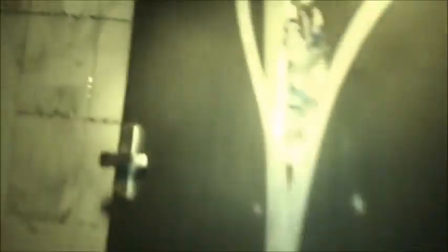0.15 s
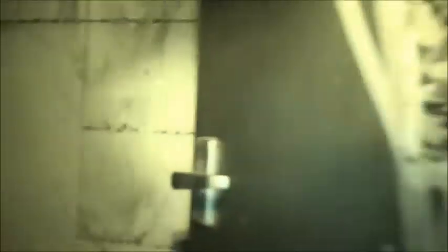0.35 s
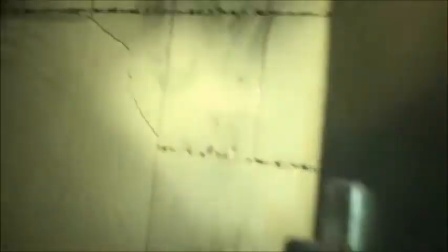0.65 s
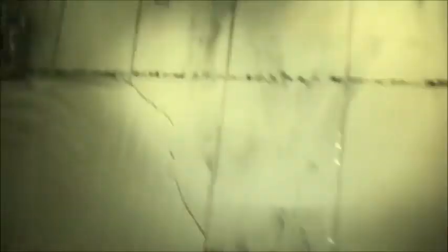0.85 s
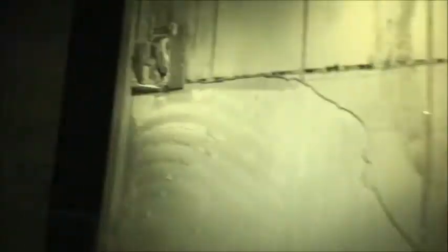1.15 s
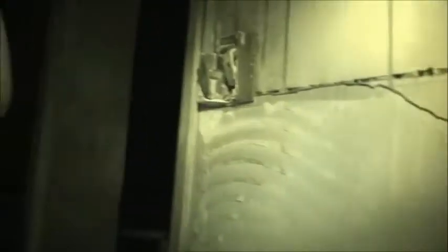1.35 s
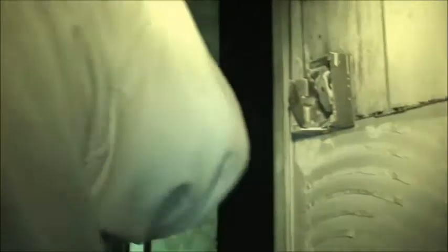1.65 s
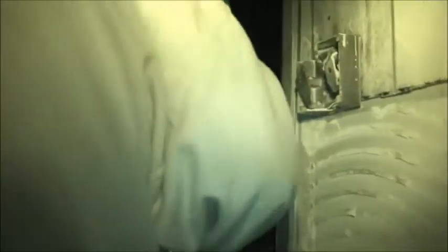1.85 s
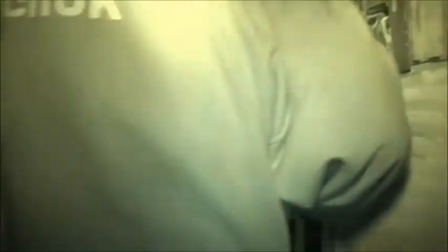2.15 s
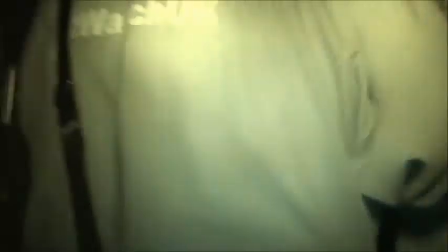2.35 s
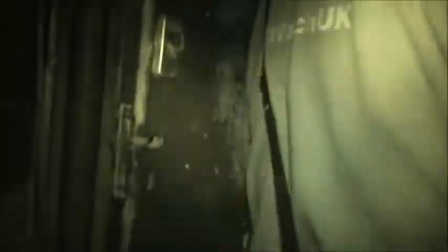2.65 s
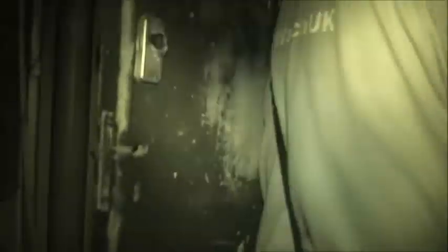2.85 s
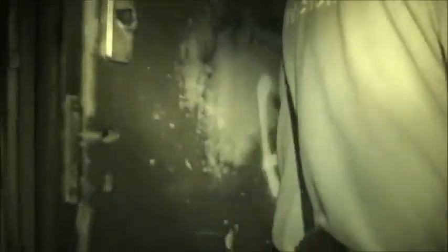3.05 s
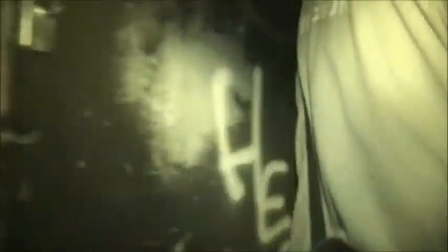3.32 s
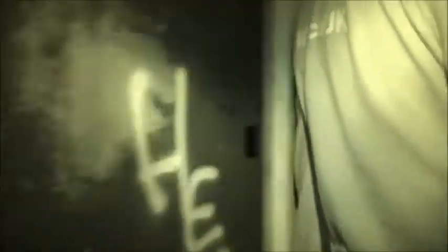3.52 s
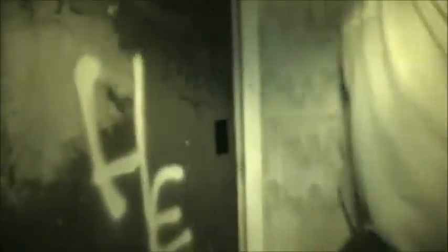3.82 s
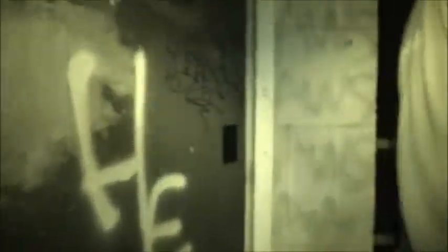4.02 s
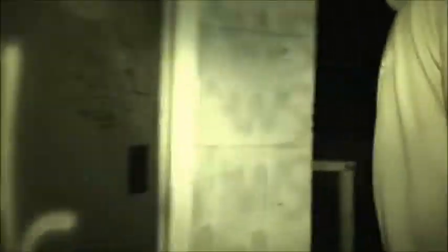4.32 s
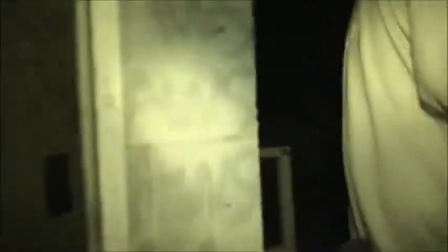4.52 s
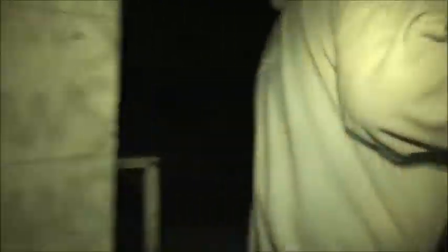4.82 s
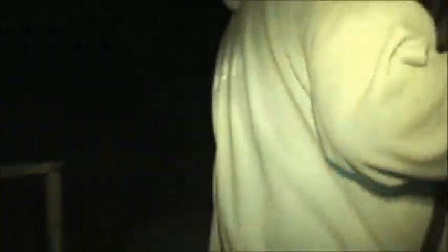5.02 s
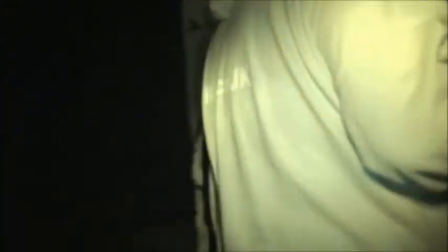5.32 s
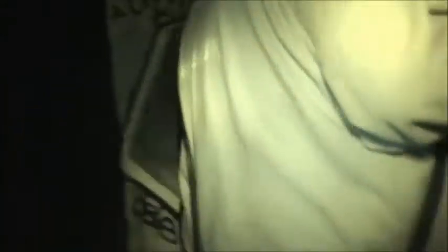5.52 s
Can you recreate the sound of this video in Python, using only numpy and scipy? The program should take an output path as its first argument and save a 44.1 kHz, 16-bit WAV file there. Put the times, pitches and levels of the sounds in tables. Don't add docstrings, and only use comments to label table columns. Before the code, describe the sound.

A sharp crunch of plaster grit opens, then a piece of debris drags across the floor with a rising scrape and low boom. Uneven steps follow, snapping splinters, rattling and squeaking glass shards, and blocks knocking. The densest crunch comes just after four seconds. Bare, hard-walled room with short reverberation; close, nearly mono camera microphone with faint hiss and handling rubs.

```python
import sys
import numpy as np
from scipy import signal
from scipy.fft import rfft, irfft, next_fast_len
from scipy.io import wavfile

SR = 44100
rng = np.random.default_rng(int(sys.argv[2]) if len(sys.argv) > 2 else 0)


def waveform_to_disk(signal):
    frames = np.transpose(np.atleast_2d(signal))
    scaled = np.clip(frames, -1, 1) * 32767
    samples = np.round(scaled).astype(np.int16)
    wavfile.write(sys.argv[1], SR, samples)


def how_loud(loudness_db):
    steps = np.asarray(loudness_db, float) / 20
    return 10 ** steps


N = 250047

# f/Hz, density/(dB per Hz)
AIR_COLOUR = [(90, -17), (150, -6.5), (1180, -18.5), (1360, -4), (1490, -34), (2710, -17), (3500, -28),
              (15000, -33.5)]
AIR_DB = -57
# t/s, level/dB, hold/s, fade/(dB/s), rise/(dB/s)
HANDLING = [
    (0.0, -56, .01, 100, 50),
    (0.73, -46.5, 0.33, 64, 63),
    (1.886, -65, .01, 300, 47),
    (4.15, -67, .03, 30, 10),
    (5.2, -62, .01, 110, 57),
    (2.55, -65, 0.03, 68, 65),
    (5.55, -80, .2, 67, 52),
]
# f/Hz, side minus mid/dB
SIDE_LEVEL = [(60, -32), (200, -19.5), (700, -13), (4400, -15.5), (9000, -12.5), (10300, -2.5),
              (11500, -11.5), (15000, -36)]
# f/Hz, T60/s
ROOM_T60 = [(100, 0.83), (1000, 0.75), (5000, 0.34), (14000, 0.069)]
ROOM_DB, NEAR_DB, NEAR_T60_S = -23, -7.5, 0.072
# t/s, level/dB, hold/s, fade/(dB/s), rise/(dB/s)
SWISH = (3.5, -52.5, -0.03, 24, 403)
FLOOR_MODES_HZ = [145, 184, 222, 282, 366]
# t/s, peak/dB, f/Hz, T60/s
THUDS = [(0.352, -31.5, 172, 0.26), (0.54, -28, 150, 0.57), (0.7, -26.5, 214, 0.34), (0.78, -23, 184, 0.79),
         (0.95, -29, 214, 0.6), (1.376, -30.5, 250, 0.48), (1.818, -31, 206, 0.45),
         (2.144, -31.5, 222, 1.4), (2.536, -28.5, 169, 0.55), (2.973, -34.5, 141, 0.34),
         (3.291, -37.5, 129.9, 0.12), (4.03, -31.5, 265, 0.29), (4.185, -23, 135, 0.12),
         (4.952, -38.5, 167, 0.73),
         (5.055, -32.5, 206, .2),
    (5.161, -35, 140, .3),
]
# f/Hz, level/dB, T60/s
PANE = [(1220, -16, .8), (2109, -7, 1.4), (3380, -17, .6), (3630, -6, 0.32), (4550, -11, 0.58)]
PANE_S, PANE_DB = 5.34, -45
# f/Hz, density/(dB per Hz)
GRIT_COLOUR = [(53, -35), (90, -7), (151, -6.5), (244, -3.5), (429, -4.5), (1440, -1.5), (2230, -4),
               (2950, -6), (4750, -4), (12100, -8.5), (13500, -14), (16000, -53)]
GRIT_SPLITS_HZ = [350, 2800, 8000]
GRIT_GROUPS_DB = [-10.5, 0.95, -1, -16.5]
# t/s, level/dB, hold/s, fade/(dB/s), brightness/(dB per band group)
SHUFFLES = [(0.0, -35, 0.01, 77, 4), (0.304, -60, 0.04, 60, -7), (0.33, -45, 0.021, 47, 5.5),
            (0.527, -43, 0.27, 73, 9), (1.352, -46.5, 0.045, 129, 6.5), (1.92, -63, 0.039, 52, -11),
            (1.984, -37, 0.019, 48, -2), (2.24, -50.5, 0.16, 27, 0.5), (2.64, -43, 0.017, 71, 7.5),
            (3.233, -43.5, 0.065, 70, -5), (3.42, -40, 0.023, 99, 0.5), (3.597, -68, 0.15, 35, 15),
            (4.22, -34.5, 0.015, 72, -3), (4.336, -36.5, 0.022, 126, 5.5), (5.136, -38, 0.058, 69, 1.5),
            (5.47, -55, 0.23, 30, -8)]
SHUFFLE_RISE_DB_PER_S, GRIT_REST_DB = 138, -64
DRAG_GRIT_DB = -2.5
# t/s, level/dB, contact resonance f/Hz
DRAG = [
    (.43, -99, 1300),
    (.47, -31.5, 1370),
    (.5, -28.5, 1380),
    (.6, -22, 1680),
    (.72, -21, 2060),
    (.9, -22, 2220),
    (1.0, -26, 2120),
    (1.07, -44.5, 2130),
    (1.14, -63, 2000),
]
# f/Hz, width/Hz, level/dB
DRAG_BODY = [(1345, 69, 14), (1900, 27, -3), (2050, 76, -3), (2620, 47, -15)]
# t/s, f/Hz
DRAG_SQUEAL = [(.43, 12800), (.6, 12600), (.75, 11850), (1.12, 11500)]
# f/Hz, width/Hz, level/dB
DRAG_BOOM = [(184, 13, 0), (214, 18, -1), (150, 11, -4.5)]
# t/s, level/dB, hold/s, fade/(dB/s), rise/(dB/s)
SQUEAL = (.59, -37, .08, 110, 300)
# t/s, level/dB, hold/s, fade/(dB/s), rise/(dB/s)
BOOM = (0.65, -37.5, 0.9, 120, 64)
# t/s, level/dB, hold/s, fade/(dB/s), rise/(dB/s)
RATTLES = [
    (1.347, -31.5, 0.035, 330, 453),
    (2.775, -33.5, 0.023, 360, 86),
    (4.435, -35, 0.0051, 380, 500),
    (5.34, -32.5, 0.014, 320, 2500),
    (5.282, -31, 0.006, 590, 3000),
]
# f/Hz, width/Hz, level/dB
HEAPS = [
    [(4100, 9.2, -12.5), (4420, 210, -0.5), (6000, 160, -2), (6700, 48, -4), (7180, 60, -5),
     (9420, 70, -4.5), (8900, 81, -10), (15000, 160, -6)],
    [(4620, 85, 1.5), (4880, 9.9, -6.5), (5260, 100, -4), (5500, 62, -15), (5800, 96, -19), (7160, 38, -10),
     (7100, 63, -4.5), (7570, 31, -8), (8040, 26, -9), (11500, 39, -16),],
    [(860, 46, 4.5), (1570, 180, -3), (1900, 180, 2), (2850, 23, -5.5), (3320, 24, -6.5)],
    [(3200, 310, -5.5), (3700, 8.3, -15), (4620, 40, -6), (5400, 120, -4), (7200, 36, -9), (6800, 35, -18),
     (7600, 27, -13), (8320, 120, -7), (10800, 63, -20), (12600, 36, -22), (13800, 51, -22)],
    [(1200, 28, -2), (2150, 69, -1), (3500, 360, -6), (4620, 49, -12)],
]
LINGER_DB, LINGER_DB_PER_S = -23, 85
# t/s, peak/dB, low mode f/Hz, high mode f/Hz, high mode level/dB
CLINKS = [(0.0805, -19.5, 5260, 7160, 2.5), (0.35, -28, 3010, 4170, -13), (1.482, -41, 4660, 9180, -19),
          (2.6537, -34, 4620, 7700, 6), (2.8594, -46, 6500, 6500, 11), (3.279, -33, 4080, 7720, 4),
          (3.5478, -32.5, 4350, 8320, 8), (3.7878, -50, 4030, 8870, -11), (4.1796, -28, 1970, 7300, 6),
          (4.233, -28.5, 4620, 7840, 3), (4.271, -27, 2400, 8200, -13), (4.326, -18, 6150, 6520, -1),
          (4.3578, -26, 2290, 8630, -3), (5.1186, -37, 5550, 6800, -15), (.885, -29, 6300, 7600, -2),
          (0.027, -31.5, 5330, 7200, -9), (2.729, -25.5, 1740, 8700, -12)]
# t/s, peak/dB, low mode f/Hz, high mode f/Hz, high mode level/dB
TAPS = [(2.979, -19, 930, 1980, -8), (2.985, -24.5, 640, 1930, 4), (3.202, -16, 1170, 1790, -10),
        (3.326, -20, 750, 1560, 0.5), (3.358, -25, 860, 1600, 3), (3.366, -23, 1260, 2340, -2),
        (3.509, -30.5, 910, 1770, -1), (4.41, -29, 1290, 2000, -6), (4.422, -27, 885, 1860, -5),
        (4.433, -18.5, 755, 1820, 2), (4.443, -24.5, 840, 1770, 5), (4.479, -28.5, 890, 1840, 4.5),
        (4.516, -27.5, 870, 1900, -4.5), (4.557, -34, 810, 1920, 3), (4.562, -34, 830, 2050, -4),
        (4.592, -29, 870, 1900, -39.5), (4.6, -46, 860, 1900, -16), (1.982, -13.5, 2100, 1710, -2),
        (1.991, -22, 2220, 1490, -6), (2.146, -26, 2700, 1014, -2), (4.041, -14, 2070, 5260, 5),
        (4.192, -19, 1960, 3700, -13), (4.338, -13, 6240, 6900, -2), (4.048, -12, 5260, 3970, -4),
        (4.359, -14, 2200, 6000, 5), (5.05, -33, 2000, 1010, -12), (5.08, -36, 1590, 4480, -9),
        (5.122, -21.5, 1210, 2210, -2), (5.134, -28, 2310, 1600, -2), (5.154, -23, 2010, 1500, -12),
        (5.167, -10.5, 5560, 4050, -10), (5.186, -25, 4300, 1800, -5), (5.209, -26, 2600, 1480, -12),
        (5.281, -16, 1220, 2150, -4), (5.339, -16.5, 3900, 5400, -5), (2.728, -11, 1710, 4600, 0),
        (1.105, -26, 890, 1510, -6), (2.539, -20, 1500, 656, -13), (2.58, -18, 2050, 605, -1)]
TAP_WIDTH_HZ, TAP_DAMPING = 70, .07
# t/s, length/s, level/dB, first f/Hz, last f/Hz
SHARD_TONES = [(.775, 0.041, -29, 2620, 2740), (.85, 0.057, -26, 2720, 2620), (0.953, 0.015, -23, 2620, 2680),
               (0.999, 0.037, -27, 2684, 2500), (1.32, 0.0088, -19, 4500, 4420),
               (1.331, 0.0075, -23, 4320, 4380), (1.327, 0.035, -29.5, 9370, 9470),
               (1.341, .04, -30, 6930, 6800), (1.347, 0.0075, -11, 4480, 4570),
               (1.355, 0.015, -16.5, 4470, 4600), (1.385, 0.045, -31, 4420, 4550),
               (1.411, 0.022, -26.5, 9260, 9140), (1.835, 0.017, -16.5, 5900, 5800),
               (1.86, 0.02, -21, 5800, 5400), (1.894, 0.023, -27.5, 1770, 1570),
               (1.906, 0.033, -34, 2510, 3200), (1.82, 0.027, -31.5, 2346, 2280),
               (1.955, 0.035, -36, 2570, 2580), (2.632, 0.072, -30.5, 7840, 7730),
               (2.649, .022, -28, 4620, 4620), (2.672, .016, -30, 7100, 7340), (2.695, 0.033, -35, 4560, 4700),
               (2.699, 0.02, -28, 5270, 5520), (2.728, 0.079, -32, 8570, 8730),
               (2.731, 0.026, -21.5, 7200, 7100), (2.748, 0.041, -26, 4640, 4700),
               (2.754, 0.064, -26.5, 5570, 5630), (2.765, 0.049, -19.5, 4970, 5430),
               (2.765, 0.044, -25, 1730, 2020), (2.795, 0.014, -55, 7200, 7200),
               (2.811, 0.033, -35, 5350, 5520), (2.853, 0.024, -29.5, 6700, 6830),
               (4.46, 0.036, -31.5, 858, 867), (4.472, 0.035, -41, 3283, 3320),
               (.08, .022, -38, 12700, 12800), (.086, 0.017, -35, 8500, 8500), (0.137, 0.029, -36, 5320, 5130),
          (.27, 0.077, -43, 4730, 4500), (.28, 0.076, -43, 3100, 3140), (.35, .02, -30.5, 2094, 2210),
          (.349, .008, -36, 11500, 11500), (.4, .02, -40, 12900, 12800), (.41, 0.034, -48, 10500, 10300),
          (0.428, 0.032, -41, 1900, 1950), (2.1, 0.016, -25, 5300, 5200), (2.155, 0.0099, -28, 3300, 3460),
          (4.232, .03, -33.5, 4620, 4620), (5.116, 0.019, -36, 5530, 5460), (5.19, 0.051, -40, 7330, 7480),
          (5.307, .03, -40, 7800, 7730), (5.349, 0.055, -27, 3700, 3670), (5.346, 0.07, -33, 4610, 4600),
          (5.345, 0.045, -29, 7810, 7860), (5.342, .04, -42, 12650, 12600),
          (5.343, 0.036, -38, 13800, 13800)]
SQUEAK_BITE_S, SQUEAK_ROUGH = .002, .5
# t/s, peak/dB, ring f/Hz, bright part/dB, T60/s
KNOCKS = [
    (1.103, -36.5, 890, -10, 0.32),
    (1.141, -36.5, 940, -7, 0.12),
]
# t/s, peak/dB, ring f/Hz, bright part/dB, T60/s
RUBBLE = [(.199, -37, 5200, 8, 0.052), (1.208, -45.5, 1360, 6.5, 0.068), (1.284, -37, 5540, -5, .075),
          (1.651, -41, 11200, 5.5, 0.13), (1.836, -10, 5800, -7, 0.45), (1.919, -17.5, 2620, -3, 0.32),
          (1.981, -11.5, 1970, -28, 0.17), (2.095, -15, 5540, -33, 0.29), (2.447, -11, 5450, -18, 0.05),
          (2.977, -22.5, 875, -17, 0.31), (3.08, -30.5, 2100, -10, 0.056), (3.534, -23, 1850, 1, 0.059),
          (3.954, -34, 4830, -10, 0.14), (4.172, -18.5, 7560, -5, 0.17), (4.19, -20, 3700, 2.5, 0.21),
          (4.359, -15, 2070, -6, 0.12), (4.423, -21, 1040, -13, 0.17), (5.117, -24.5, 1900, -8, 0.1)]
# t/s, peak/dB, ring f/Hz, bright part/dB, T60/s
LUMPS = [(0.0, -8.5, 6600, -3, 0.029), (.35, -20.5, 2560, -5, 0.16), (.398, -33, 3320, 9, .05),
         (.554, -8, 5500, -9.5, 0.11), (2.145, -11.5, 2560, -4, 0.16), (2.539, -13, 1580, -3, 0.3),
         (2.578, -18.5, 2050, -27, 0.37), (3.154, -34.5, 2250, -16, 0.15), (3.356, -22, 1190, -19, 0.043),
         (4.012, -20.5, 4400, 1.5, 0.11), (4.024, -15.5, 1630, -35, 0.32), (4.083, -18, 1800, -13.5, 0.13),
         (4.943, -36, 1450, -16, 0.47), (4.979, -22, 6900, -11, 0.054), (5.078, -21, 1670, -12, 0.064),
         (5.662, -23, 2420, -18, 0.023)]
# t/s, peak/dB, ring f/Hz, bright part/dB, T60/s
SPLINTERS = [(.082, -14.5, 6700, -36, 0.21), (1.32, -30.5, 4150, -2, .1), (1.349, -29, 4590, 11.5, 0.11),
             (1.416, -19, 9170, -11, 0.058), (1.823, -9, 8100, -34, 0.24), (2.697, -6.5, 4830, -6, 0.082),
             (2.729, -19, 1710, 4, 0.05), (2.773, -15.5, 5330, -20, 0.43), (2.859, -13, 5640, -21, 0.088),
             (3.201, -14.5, 1150, -14, 0.13), (3.278, -28.5, 4120, 6.5, 0.15),
             (3.324, -21, 1510, -21, 0.043), (3.396, -23, 1440, -6.5, 0.66), (3.547, -14, 8060, -29, 0.06),
             (4.04, -1.5, 5330, -21, 0.067), (4.223, -11.5, 4620, -24, 0.09), (4.317, -8, 6450, -7, 0.07),
             (4.642, -17.5, 1400, -12.5, .15), (5.164, -12.5, 5630, 7, 0.028), (5.21, -25, 1510, -10, 0.12),
             (5.281, -19, 1200, -12.5, 0.082), (5.339, -21.5, 3960, -8, 0.18)]
KNOCK_DULL_DB, RUBBLE_DULL_DB, LUMP_DULL_DB, SPLINTER_DULL_DB = 15, -15, -5.5, -48


def rms_one(x):
    return x / np.sqrt(np.mean(x ** 2) + 1e-20)


def in_time(rows):
    s, *columns = np.transpose(rows)
    t = np.arange(N) / SR
    inside = np.interp(t, [s[0], s[0] + 0.0092, s[-1] - .03, s[-1]], [0, 1, 1, 0])
    return [inside] + [np.interp(t, s, c) for c in columns]


def at_hz(points, hz):
    points_hz, value = np.array(points).T
    return np.interp(np.log(hz), np.log(points_hz), value)


def band(x, low_hz, high_hz):
    return signal.sosfilt(signal.butter(2, [low_hz, high_hz], "band", fs=SR, output="sos"), x)


def highpass(x, order, hz):
    return signal.sosfilt(signal.butter(order, hz, "high", fs=SR, output="sos"), x)


def resonate(x, hz, width_hz):
    r, w = np.exp(-np.pi * width_hz / SR), 2 * np.pi * hz / SR
    return signal.lfilter([0, np.sin(w)], [1, -2 * r * np.cos(w), r * r], x + 1e-18)


def mode_width(t60):
    return np.log(1000) / np.pi / t60


def follow(x, centre_hz, half_width_hz):
    turn = np.exp(2j * np.pi * np.cumsum(centre_hz) / SR)
    lowpass = signal.butter(2, half_width_hz, fs=SR, output="sos")
    return rms_one((signal.sosfilt(lowpass, x / turn) * turn).real)


def drift(rate):
    points = rng.standard_normal(int(N / SR * rate) + 2)
    return np.interp(np.arange(N) / SR * rate, np.arange(len(points)), points)


def grains(size, per_s, spread_db):
    sizes = how_loud(spread_db * np.minimum(rng.exponential(1, size), 5)) * rng.choice([-1, 1], size)
    return rms_one(sizes * (rng.random(size) < per_s / SR) + 1e-9)


def stroke(s, level_db, hold_s, fade, rise):
    t = np.arange(N) / SR - s
    return level_db - abs(rise) * np.maximum(-t, 0) - abs(fade) * np.maximum(t - abs(hold_s), 0)


def modes(x, peaks, widen):
    total = np.zeros(len(x))
    for k, (hz, width_hz, db) in enumerate(peaks):
        fed = x * how_loud(db + 4.5 * drift(45.83)[:len(x)])
        total += (-1) ** k * np.sqrt(width_hz) * resonate(fed, hz, widen * width_hz)
    return rms_one(total)


def noise_bank(source, colour, patchy_db, together_db):
    edges, clump = 85 * 2 ** np.arange(0, 7.7, .5), drift(35.0)
    centres = np.sqrt(edges[1:] * edges[:-1])
    bands = []
    for k, hz in enumerate(centres):
        level_db = at_hz(colour, hz) + together_db * clump + patchy_db * drift(14.0)
        bands.append(how_loud(level_db) * band(source[k % 2], edges[k], edges[k + 1]))
    return centres, bands


def air():
    _, bands = noise_bank(rng.standard_normal((2, N)), AIR_COLOUR, patchy_db=1.0, together_db=3)
    return how_loud(AIR_DB - 3.0) * rms_one(sum(bands))


def handling():
    lumps = rms_one(band(band(rng.standard_normal(N), 38, 85), 30, 85))
    return sum(how_loud(stroke(*row)) for row in HANDLING) * lumps


def room(x):
    size = next_fast_len(N + SR)
    t, edges = np.arange(SR) / SR, 60 * 2 ** np.arange(0, 8.1, 1)
    white = rng.standard_normal((2, SR))
    tail = np.zeros((2, SR))
    for low_hz, high_hz in zip(edges, edges[1:]):
        t60 = at_hz(ROOM_T60, np.sqrt(low_hz * high_hz))
        tail += band(white, low_hz, high_hz) * how_loud(-60 * t / t60)
    near = rng.standard_normal((2, SR)) * how_loud(-60 * t / NEAR_T60_S) * (t > .004)
    echo = how_loud(ROOM_DB) * rms_one(tail) + how_loud(NEAR_DB) * rms_one(near)
    echo[0] = highpass(echo[0], 2, 330)
    wet = rfft(echo / np.sqrt(SR), size) * rfft(x, size)
    hz = np.arange(wet.shape[1]) * SR / size + 1
    wet[1] *= how_loud(at_hz(SIDE_LEVEL, hz) + 6.5)
    mid, side = irfft(wet, size)[:, :N]
    return np.array([x + mid + side, x + mid - side]) * 1.056


def swish():
    return how_loud(stroke(*SWISH)) * rms_one(band(grains(N, 3000.0, spread_db=1.5), 430, 690))


def thuds():
    out, t = np.zeros(N + SR), np.arange(SR) / SR
    for s, peak_db, hz, t60 in THUDS:
        width_hz = mode_width(max(t60, .05))
        push = band(rng.standard_normal(len(t)) * np.exp(-t / .012), 110, 450)
        boom = 1.47 * resonate(push, hz, 48.0)
        for mode_hz in FLOOR_MODES_HZ:
            octaves_off = abs(np.log2(mode_hz / hz))
            boom += how_loud(-7.0 * octaves_off) * resonate(push, mode_hz, width_hz)
        at = round(s * SR)
        out[at:at + len(t)] += how_loud(peak_db - 3.5) * boom / np.abs(boom).max()
    return out[:N]


def pane():
    t = np.arange(N) / SR - PANE_S
    taps_on_pane = grains(N, 900.0, spread_db=-1.0) * (t > 0) * np.exp(-np.abs(t) / 0.011)
    taps_on_pane /= np.sqrt(np.sum(taps_on_pane ** 2))
    return sum(how_loud(PANE_DB + db) * resonate(taps_on_pane, hz, mode_width(t60)) for hz, db, t60 in PANE)


def grit():
    source = [0.67 * rng.standard_normal(N) + 0.62 * grains(N, 2500.0, spread_db=4.0) for _ in "ab"]
    centres, bands = noise_bank(source, GRIT_COLOUR, patchy_db=1.5, together_db=1.2)
    group = np.searchsorted(GRIT_SPLITS_HZ, centres)
    moves = []
    for s, db, hold_s, fade, tilt_db in SHUFFLES:
        moves.append((how_loud(stroke(s, db, hold_s, fade, SHUFFLE_RISE_DB_PER_S)), tilt_db))
    inside, drag_db, _ = in_time(DRAG)
    out = np.zeros(N)
    for k, db in enumerate(GRIT_GROUPS_DB):
        gain = how_loud(GRIT_REST_DB) + sum(move * how_loud(tilt_db * max(k - 1, 0)) for move, tilt_db in moves)
        if k == 1:
            gain += inside * how_loud(drag_db + DRAG_GRIT_DB)
        noise = rms_one(sum(b for b, g in zip(bands, group) if g == k))
        out += how_loud(db - 5.5) * gain * noise
    return out


def drag():
    stop = round(DRAG[-1][0] * SR)
    inside, level_db, centre_hz = [c[:stop] for c in in_time(DRAG)]
    slips = grains(stop, 4500.0, spread_db=2.2) * how_loud(1.5 * drift(90.0)[:stop])
    contact = 0.47 * follow(slips, centre_hz, 170)
    contact += 0.2 * follow(slips, 1.55 * centre_hz, 420)
    contact += 0.29 * follow(slips, 0.73 * centre_hz, 300)
    body = contact + .3 * modes(slips, DRAG_BODY, widen=3)
    glass_hz = in_time(DRAG_SQUEAL)[1][:stop]
    squeal = follow(slips, glass_hz, 330)
    squeal += .5 * follow(slips, 0.8 * glass_hz, 360)
    squeal += 1.6 * follow(slips, 0.456 * glass_hz, 610)
    squeal *= how_loud(stroke(*SQUEAL)[:stop] + 2.2 * drift(40.3)[:stop])
    boom = how_loud(stroke(*BOOM)[:stop]) * modes(slips, DRAG_BOOM, widen=0.99)
    return np.pad(inside * (how_loud(level_db) * body + squeal + boom), (0, N - stop))


def rattles():
    out = np.zeros(N)
    for (s, db, hold_s, fade, rise), peaks in zip(RATTLES, HEAPS):
        span = slice(round((s - .2) * SR), round((s + .6) * SR))
        gain = how_loud(stroke(s, db, hold_s, fade, rise))
        gain += how_loud(stroke(s, db + LINGER_DB, hold_s, LINGER_DB_PER_S, rise))
        knocks = band(grains(len(out[span]), 600.0, spread_db=1.5), 960, 15000)
        out[span] += gain[span] * how_loud(3.0) * modes(knocks, peaks, widen=2.7)
    return out


def clinks():
    out, t = np.zeros(N + SR), np.arange(SR // 4) / SR
    for s, peak_db, low_hz, high_hz, high_db in CLINKS:
        bounces = grains(len(t), 1500.0, spread_db=4.0) * np.exp(-t / .007)
        low = resonate(bounces, low_hz, 62.0) + .5 * resonate(bounces, low_hz * 1.2, 170.0)
        high = resonate(bounces, high_hz, 48.0) + .5 * resonate(bounces, high_hz * 1.1, 79.0)
        tone = low + how_loud(high_db) * high
        at = round(s * SR)
        out[at:at + len(t)] += how_loud(peak_db + 8.0) * tone / np.abs(tone).max()
    return out[:N]


def taps():
    out, click = np.zeros(N + SR), band(np.eye(1, SR // 20)[0], 630, 7500)
    for s, peak_db, low_hz, high_hz, high_db in TAPS:
        low = resonate(click, low_hz, TAP_WIDTH_HZ + TAP_DAMPING * low_hz)
        high = resonate(click, high_hz, TAP_WIDTH_HZ + TAP_DAMPING * high_hz)
        at = round(s * SR)
        out[at:at + len(click)] += how_loud(peak_db - 1.0) * (low + how_loud(high_db) * high + click)
    return out[:N]


def squeaks():
    out, t = np.zeros(N + SR), np.arange(SR // 6) / SR
    grain = np.pad(1 + SQUEAK_ROUGH * (drift(350.0) + 1j * drift(350.0)), (0, SR))
    for s, length_s, level_db, first_hz, last_hz in SHARD_TONES:
        at = round(s * SR)
        phase = 2 * np.pi * np.cumsum(np.interp(t, [0, length_s], [first_hz, last_hz])) / SR
        shape = (1 - np.exp(-t / SQUEAK_BITE_S)) * np.exp(-(t / (0.82 * length_s)) ** 2)
        tone = (grain[at:at + len(t)] * np.exp(1j * phase)).real
        out[at:at + len(t)] += how_loud(level_db - 3.0) * shape * tone
    return out[:N]


def cracks(rows, dull_db):
    out, t = np.zeros(N + SR), np.arange(SR // 5) / SR
    clumps = np.pad(how_loud(3.0 * drift(220.0)), (0, SR), "wrap")
    for s, peak_db, ring_hz, bright_db, t60 in rows:
        at = round(s * SR)
        start, rise_s = (.15, .004) if ring_hz > 4200 else (1.7, .0015)
        burst = grains(len(t), 5000.0, spread_db=3.0) * clumps[at:at + len(t)] * how_loud(-60 * t / max(t60, .01))
        snap = burst * (1 + (start - 1) * np.exp(-t / rise_s))
        spray = snap * (1 - .75 * np.exp(-t / .003))
        parts = how_loud(dull_db + 12.0) * band(snap, 363, 1600)
        parts += 1.73 * band(band(snap, 1340, 6570), 1380, 6550)
        parts += how_loud(bright_db + 6) * band(band(spray, 4500, 13500), 4000, 15000)
        parts += 2.9 * np.sqrt(3000 / ring_hz) * band(snap, ring_hz / 1.313, ring_hz * 1.275)
        width_hz = 150 + .035 * ring_hz
        parts += .035 * resonate(snap, ring_hz, width_hz)
        for ratio in 2 ** rng.uniform(-0.89, 0.665, 4):
            parts += .024 * resonate(snap, ring_hz * ratio, width_hz)
        out[at:at + len(t)] += how_loud(peak_db - 13.0) * parts
    return out[:N]


def scene():
    airborne = swish() + thuds() + pane() + grit() + drag() + rattles() + clinks()
    airborne += cracks(KNOCKS, KNOCK_DULL_DB) + cracks(RUBBLE, RUBBLE_DULL_DB)
    airborne += cracks(LUMPS, LUMP_DULL_DB) + cracks(SPLINTERS, SPLINTER_DULL_DB)
    airborne = highpass(airborne, 6, 104)
    return room(airborne + air() + handling() + squeaks() + taps())


def low_pass(x):
    return signal.sosfilt(signal.butter(12, 16300, fs=SR, output="sos"), x)


def record(dry):
    top = signal.sosfilt(signal.butter(4, 13600, fs=SR, output="sos"), dry)
    return low_pass(0.39 * np.tanh(top / 0.33))


dry = scene()
out = record(dry)
waveform_to_disk(out)
```